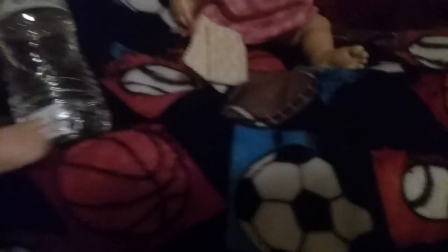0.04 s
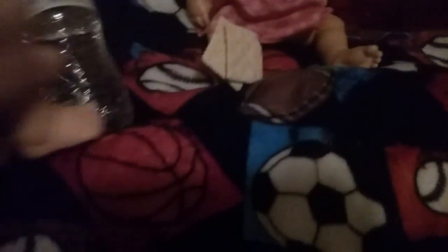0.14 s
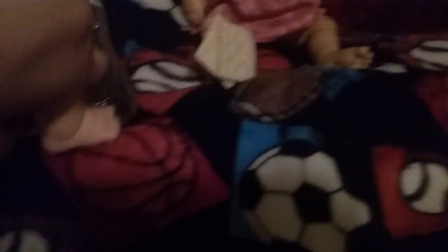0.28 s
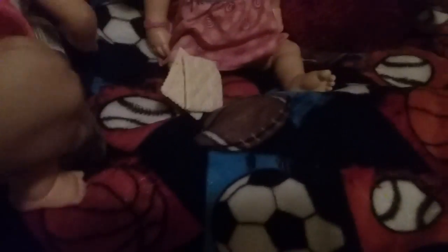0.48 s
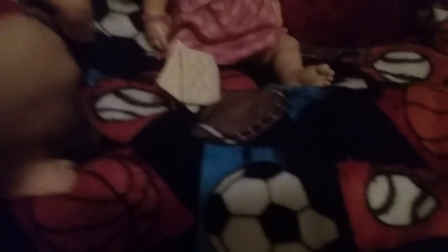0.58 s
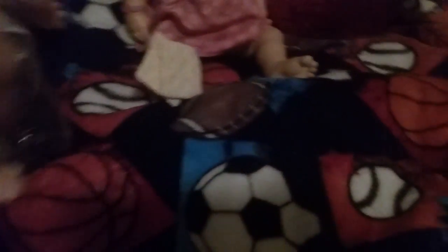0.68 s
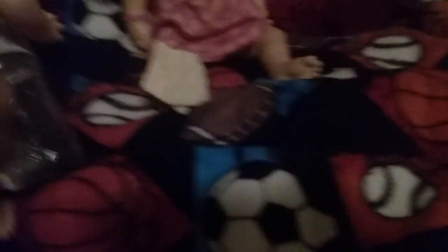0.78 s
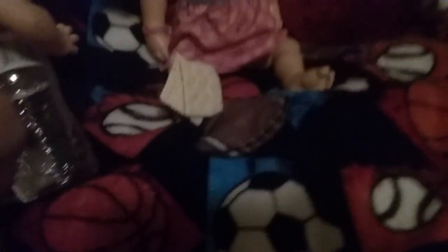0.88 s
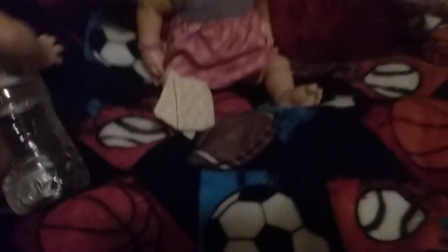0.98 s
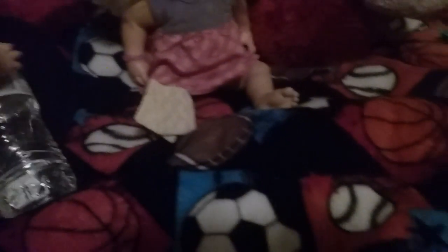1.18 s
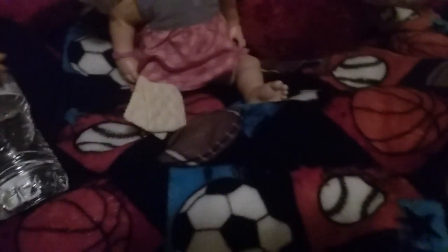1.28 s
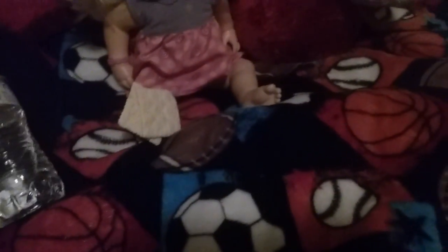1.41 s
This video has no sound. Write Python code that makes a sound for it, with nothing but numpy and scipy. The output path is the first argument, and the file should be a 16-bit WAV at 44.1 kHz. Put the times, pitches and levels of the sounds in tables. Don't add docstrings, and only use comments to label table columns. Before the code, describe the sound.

A thin plastic bottle crackles sharply as a hand squeezes it in a soft-furnished room

```python
import sys
import numpy as np
from scipy import signal
from scipy.io import wavfile
from scipy.ndimage import uniform_filter1d

SR = 44100
rng = np.random.default_rng(int(sys.argv[2]) if len(sys.argv) > 2 else 0)


def transcribe(signal):
    frames = np.atleast_2d(signal).T
    limited = np.clip(frames, -1, 1)
    pcm = np.round(limited * 32767).astype(np.int16)
    wavfile.write(sys.argv[1], SR, pcm)


def gain_from_decibels(decibels):
    exponent = np.asarray(decibels, float) / 20
    return 10 ** exponent


N = 63945

# f/Hz, density/dB per Hz
FLOOR_SPECTRUM = [(18, -56), (30, -17.5), (86, 5), (432, -8), (577, -10.5), (3760, -25.5), (4770, -27),
                  (15200, -32.5), (16500, -50)]
# t/s, level/dB
GATE_RIDE = [(0, -53), (.2, -55), (.236, -66), (.25, -57), (.6, -59), (.69, -57), (.705, -60), (.728, -67),
             (.74, -60), (.82, -65), (.832, -59), (.885, -63), (.93, -58), (1.16, -60), (1.18, -65),
             (1.2, -59), (1.248, -64), (1.28, -58)]
# f/Hz, width/Hz, level/dB
MIC_PEAK = (5200, 1300, 4)
MIC_DIP = (3800, 1000, -4)
# t/s, level/dB
RUB_RIDE = [
    (0, -59),
    (.04, -54.5),
    (.11, -62.5),
    (.15, -62),
    (.2, -69),
    (.235, -99),
]
# f/Hz, width/Hz, level/dB
RUB_PEAKS = [(3000, 800, -9), (5500, 900, -1), (6300, 1100, 0)]
# t/s, peak level/dB, low modes level/dB, top modes level/dB, air thump level/dB
SNAPS = [(0.0766, -42.5, 16, -40, -34), (0.1258, -37, 4, -36, -6.5), (0.154, -38, -15, -17, -24),
         (0.16, -47, 11, -41, -30), (0.1707, -23, -6.5, -24, -21.5), (0.209, -56, 3.5, -35, -27),
         (0.212, -51, 15, -30, -35), (0.225, -61, -4, -41.5, -35), (.2420, 2.5, -9, -13, -43),
         (.3732, -4, -2.5, -25.5, -27.5), (.4040, -19.5, -8, -37.5, -9.5), (0.4094, 1, -9, -30, -25),
         (.4290, -6.5, 10.5, -40.5, -15.5), (0.434, -5, -0.5, -39, -25), (.4592, 1.5, -4, -29, -38),
         (0.4702, -11.5, -1, -19.5, -35.5), (0.4779, -9.5, -10.5, -23.5, -17.5),
         (.6490, -43.5, 0, -36, -10), (0.6793, -39.5, 3.5, -38.5, -17), (.7319, -29.5, 2.5, -30, -15),
         (0.7453, -47, 16, -35, -25), (.7545, -49, -9, -38, -12)]
# f/Hz, level/dB, t60/s
LOW_MODES = [(2220, -11.5, .008), (2486, 5, 0.0051), (2820, 0, 0.013), (3400, 1, 0.013)]
HIGH_MODES = [(4286, -10, 0.025), (4800, 1, 0.013), (5146, 11, 0.0038), (5560, -9.5, .008),
              (6360, -20, 0.0027), (7910, -41, 0.0088)]
TOP_MODES = [(9650, -10.5, 0.0059), (11100, 0, 0.0017), (13230, -5, 0.00215), (14300, -15, 0.0038)]
# f/Hz, level/dB, t60/s
THUMP_MODES = [(480, -6.5, 0.0033), (1103, 3, 0.019), (1509.6, 2, 0.016)]
# f/Hz, level/dB, t60/s
ROOM_TAIL = [(1040, -30.5, 0.29), (1785, -23, 0.16), (2790, -23.5, 0.18), (3540, -21, 0.25),
             (4820, -20, 0.32), (6390, -34, 0.28), (7800, -33, 0.23)]
# t/s, peak level/dB, f/Hz, t60/s
KNOCKS = [
    (0.1257, -22, 480, 0.007),
    (.17, -46.5, 130, 0.15),
    (0.245, -50, 103.5, .05),
    (.405, -43.5, 362, 0.016),
    (0.431, -43.5, 198, 0.14),
    (0.459, -41.5, 223.6, 0.15),
    (0.681, -42, 248, 0.031),
]
# t/s, level/dB
CREASE_RIDE = [
    (.244, -50),
    (.28, -40.5),
    (.365, -44),
    (.42, -49.5),
    (.475, -43),
    (.52, -43.5),
    (.6, -56),
    (.72, -90),
]

BEND_S = 0.00026
GRIP_T60_S = .011


def curve(table):
    rows = np.array(table)
    return np.interp(np.arange(N) / SR, rows[:, 0], rows[:, 1])


def unit(x):
    return x / np.sqrt(np.mean(x ** 2))


def band(x, hz, width):
    b, a = signal.iirpeak(min(hz, .45 * SR), hz / width, fs=SR)
    return signal.lfilter(b, a, x)


def double_band(x, hz, width):
    return band(band(x, hz, width), hz, width)


def walk(rate):
    hold = int(SR / rate)
    held = np.repeat(rng.standard_normal(N)[:N // hold + 1], hold)
    return 1.4 * uniform_filter1d(uniform_filter1d(held, hold), hold // 2)[:N]


def ring(modes, chance, t, longest_s):
    hz, db, t60 = np.array(modes).T[:, :, None]
    scatter_db = 1.5 * chance[:len(modes), None]
    detune = 1 + .015 * chance[-len(modes):, None]
    decay = 1000. ** (-t / np.minimum(t60, longest_s))
    swing = gain_from_decibels(db + scatter_db) * np.sin(2 * np.pi * hz * detune * t) * decay
    return swing.sum(axis=0) * (1 - np.exp(-(t / BEND_S) ** 2))


def floor():
    rows, out = np.array(FLOOR_SPECTRUM), 0
    gate_db = curve(GATE_RIDE)
    shared_db = 2.2 * walk(80) + gate_db - gate_db.mean()
    for hz in 40 * 2 ** np.arange(0, 8.8, .5):
        db = np.interp(np.log(hz), np.log(rows[:, 0]), rows[:, 1]) + 10 * np.log10(hz)
        depth = .55 + .45 / (1 + hz / 1500)
        move_db = depth * shared_db + 1.2 * walk(35)
        hiss = unit(double_band(rng.standard_normal(N), hz, hz / 2))
        out = out + gain_from_decibels(db + move_db) * hiss
    for hz, width, db in MIC_PEAK, MIC_DIP:
        out = out + (gain_from_decibels(db) - 1) * band(out, hz, width)
    return unit(out) * gain_from_decibels(-57)


def rubbing():
    t = np.arange(N) / SR
    grain = rng.standard_normal(N) * gain_from_decibels(0.83 * walk(150))
    rub = unit(sum(gain_from_decibels(db) * double_band(grain, hz, width) for hz, width, db in RUB_PEAKS))
    rub = rub * gain_from_decibels(curve(RUB_RIDE)) * (t < RUB_RIDE[-1][0])

    stop_s, rise_s, fall_s = 1.103, .035, .003
    swell = np.exp(-np.where(t < stop_s, (stop_s - t) / rise_s, (t - stop_s) / fall_s))
    brush = band(grain, 4700, 867)
    brush = brush + gain_from_decibels(-0.5) * band(grain, 2840, 1433)
    brush = brush + gain_from_decibels(-31) * band(grain, 8500, 1700)
    return rub + gain_from_decibels(-60.5) * swell * unit(brush)


def snaps():
    out, t = np.zeros(N + 4096), np.arange(1024) / SR
    step_hz, step_slip = 2600, .18
    for s, db, low_db, top_db, thump_db in SNAPS:
        chance = rng.standard_normal((4, 12))
        slip, force = rng.random((2, 4))
        ticks = np.zeros(256)
        ticks[0] = .8
        steps = (np.arange(1, 5) + step_slip * (slip - .5)) / step_hz
        np.add.at(ticks, (steps * SR + .5).astype(int), force ** 2 * np.clip(1 + db / 50, 0, 1))

        families = [(HIGH_MODES, 0, GRIP_T60_S), (LOW_MODES, low_db, GRIP_T60_S), (TOP_MODES, top_db, .0025)]
        body = 0
        for (modes, family_db, longest_s), c in zip(families, chance):
            tone = np.convolve(ring(modes, c, t, longest_s), ticks)[:len(t)]
            body = body + gain_from_decibels(family_db) * tone / np.abs(tone).max()
        body = body / np.abs(body).max()
        body = body + gain_from_decibels(thump_db) * ring(THUMP_MODES, chance[3], t, GRIP_T60_S)
        i = int(s * SR)
        out[i:i + len(t)] += gain_from_decibels(db) * body
    return out[:N]


def room():
    t, blows = np.arange(N) / SR, np.zeros(N)
    rows = np.array(SNAPS)
    blows[(rows[:, 0] * SR).astype(int)] = gain_from_decibels(rows[:, 1])

    patchy_db = 5 * walk(380) * np.exp(-t / .02)
    air = rng.standard_normal(N) * gain_from_decibels(patchy_db - 7 * (t < .0098))
    tail = sum(gain_from_decibels(db) * double_band(air, hz, hz * 0.45) * 1000. ** (-t / t60) for hz, db, t60 in ROOM_TAIL)

    shelf_hz = 8500
    low_pass = signal.ellip(6, 1, 40, shelf_hz, fs=SR, output="sos")
    sheen_band = signal.butter(2, [shelf_hz, 1.6 * shelf_hz], "band", fs=SR, output="sos")
    tail = signal.sosfilt(low_pass, tail)
    sheen = gain_from_decibels(-47) * signal.sosfilt(sheen_band, air) * 1000. ** (-t / .25)
    return signal.fftconvolve(blows, tail + sheen)[:N]


def knocks():
    start, db, hz, t60 = np.array(KNOCKS).T[:, :, None]
    t = np.maximum(np.arange(N) / SR - start, 0)
    onset = 1 - np.exp(-t * hz * 2)
    return (gain_from_decibels(db) * np.sin(2 * np.pi * hz * t) * 1000. ** (-t / t60) * onset).sum(axis=0)


def creases():
    ticks = (rng.random(N) < 3000 / SR) * rng.standard_normal(N)
    t, steady = np.arange(1024) / SR, np.zeros(12)
    wall = ring(HIGH_MODES, steady, t, 0.012)
    wall = wall + gain_from_decibels(-1) * ring(LOW_MODES, steady, t, 0.0056)
    wall = wall + gain_from_decibels(-13.5) * ring([(7400, 0, 1)], steady, t, 0.0012)
    time = np.arange(N) / SR
    on = (time > CREASE_RIDE[0][0]) & (time < CREASE_RIDE[-1][0])
    return unit(signal.fftconvolve(ticks, wall)[:N]) * gain_from_decibels(curve(CREASE_RIDE)) * on


def scene():
    return (floor() + rubbing() + snaps() + room() + knocks() + creases())[None]


def band_limit(x):
    return signal.sosfilt(signal.butter(12, 16820, fs=SR, output="sos"), x)


def record(dry):
    mix = dry / (1 + (dry / .9) ** 10) ** (1 / 10)
    mix = signal.sosfilt(signal.ellip(8, .2, 60, 16200, fs=SR, output="sos"), mix)
    mix = signal.sosfilt(signal.butter(4, 46, "high", fs=SR, output="sos"), mix)
    return band_limit(mix)


dry = scene()
out = record(dry)
transcribe(out)
```